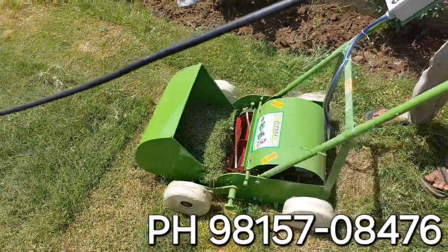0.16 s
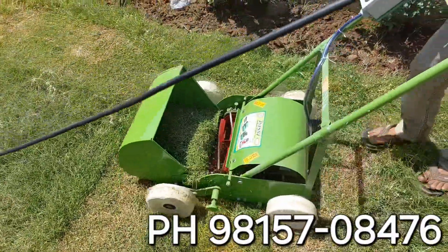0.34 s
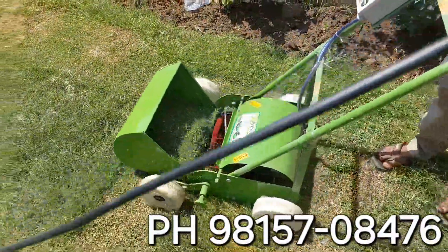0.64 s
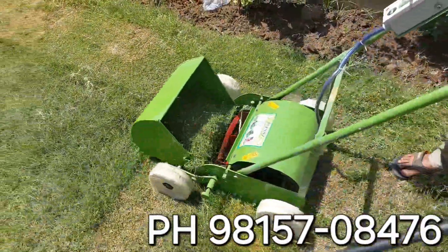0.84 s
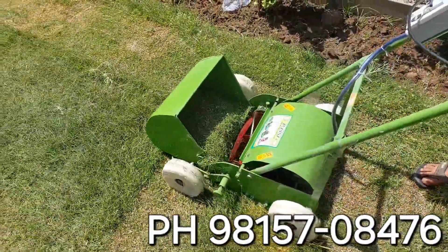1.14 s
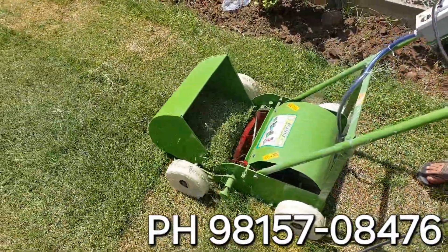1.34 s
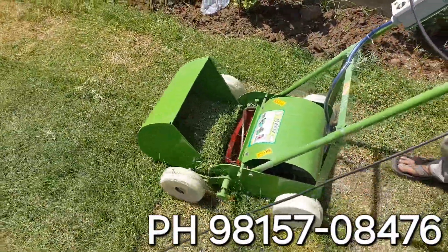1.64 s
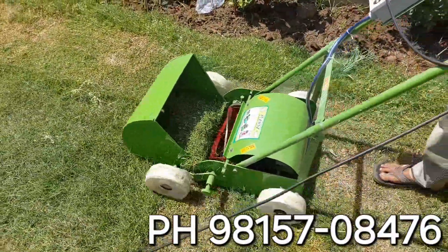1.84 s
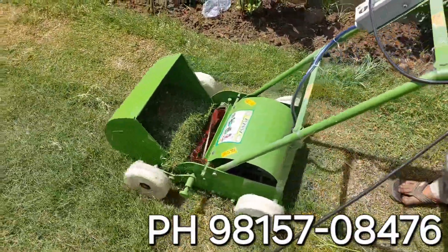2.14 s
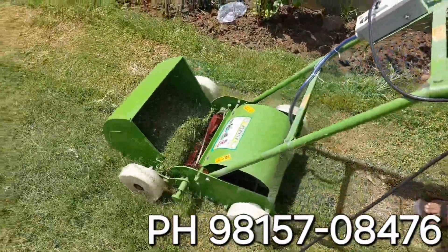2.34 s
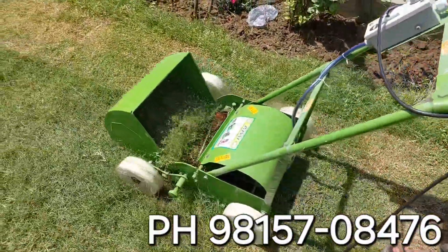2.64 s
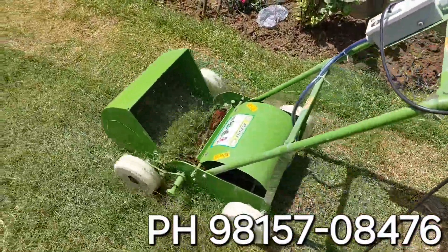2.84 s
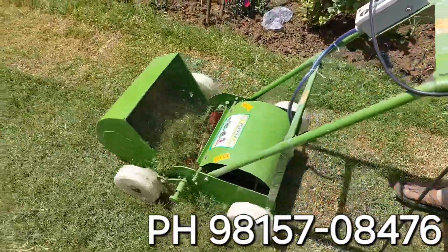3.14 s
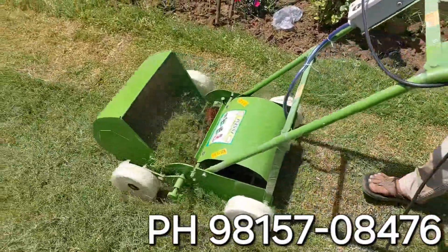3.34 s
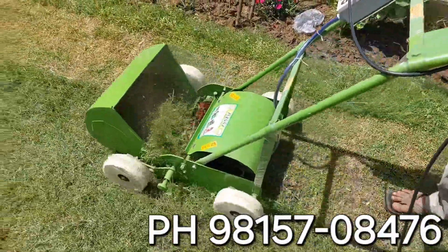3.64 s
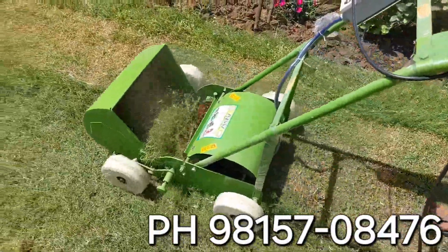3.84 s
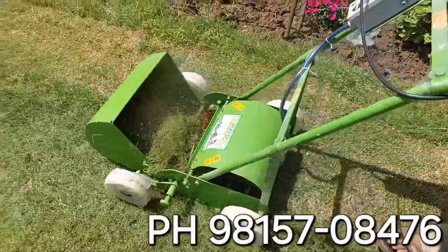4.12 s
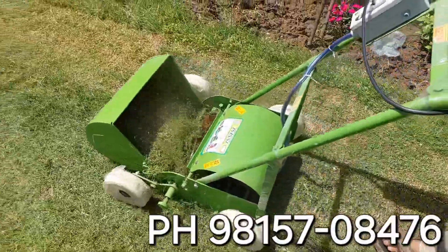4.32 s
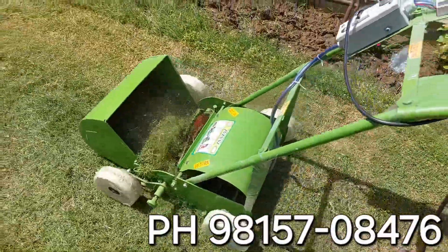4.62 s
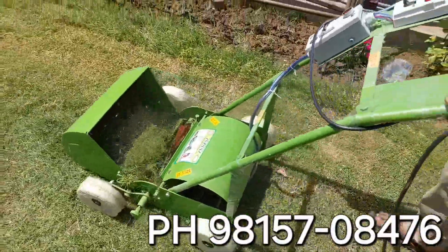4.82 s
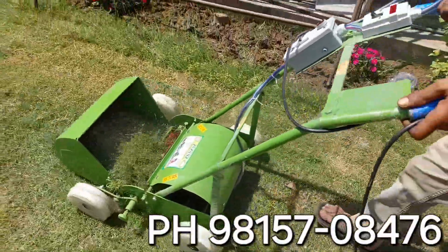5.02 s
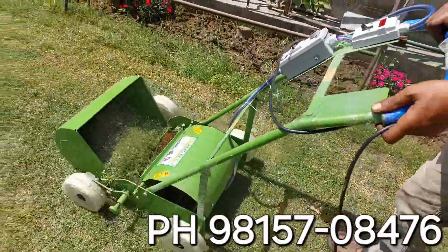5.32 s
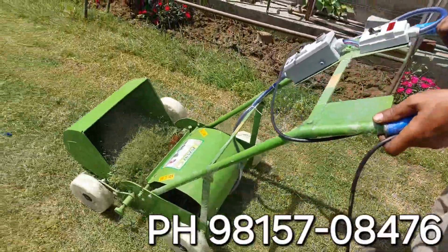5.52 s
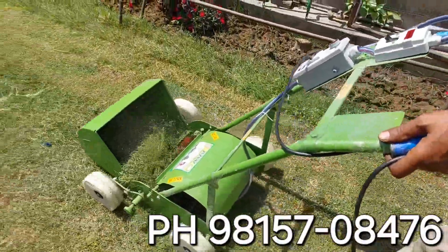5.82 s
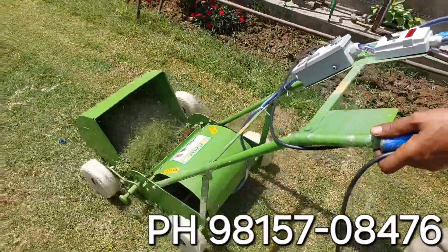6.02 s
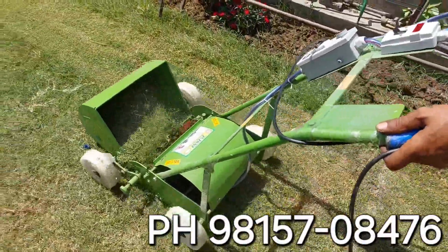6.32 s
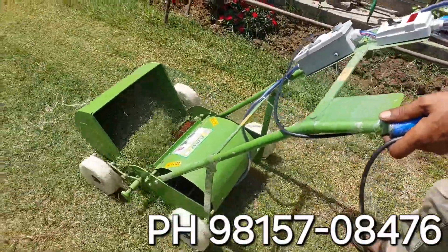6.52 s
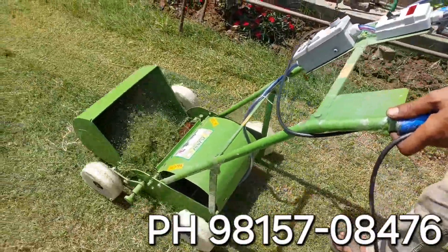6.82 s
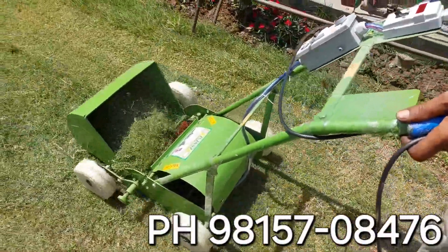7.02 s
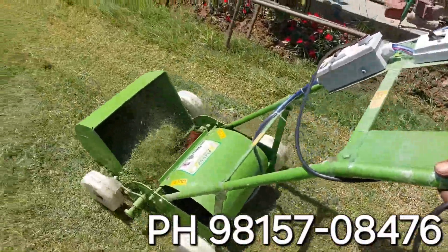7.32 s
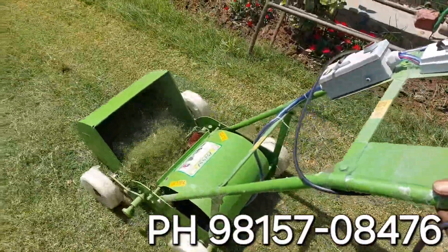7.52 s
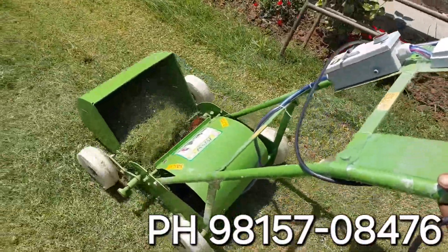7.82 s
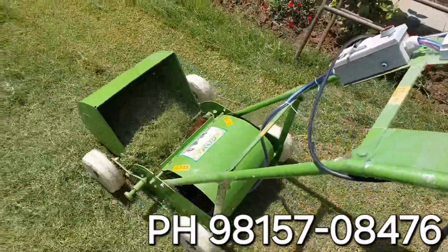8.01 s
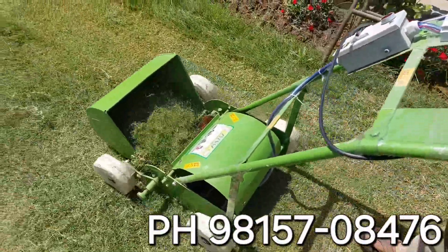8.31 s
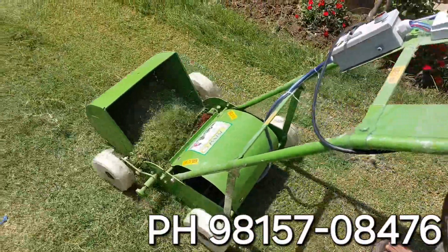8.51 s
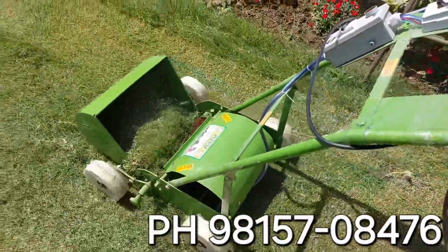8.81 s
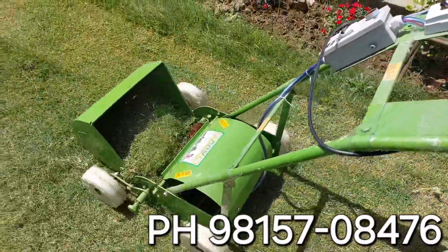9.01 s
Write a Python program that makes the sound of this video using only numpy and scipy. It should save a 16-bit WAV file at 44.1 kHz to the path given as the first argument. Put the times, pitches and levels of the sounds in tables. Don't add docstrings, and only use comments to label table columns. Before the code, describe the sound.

An electric cylinder mower whirrs steadily on a lawn, its metallic blade reel rattling and scraping over a low drumming hum.

```python
import sys
import numpy as np
from scipy import signal
from scipy.fft import rfft, irfft, next_fast_len
from scipy.io import wavfile
from scipy.ndimage import uniform_filter1d, map_coordinates

SR = 44100
rng = np.random.default_rng(int(sys.argv[2]) if len(sys.argv) > 2 else 0)


def store_wav(level_fs):
    pcm = np.round(np.clip(np.atleast_2d(level_fs), -1, 1) * 32767)
    wavfile.write(sys.argv[1], SR, pcm.T.astype(np.int16))


def decibels_to_gain(level_db):
    exponent = np.asarray(level_db, float) / 20
    return 10 ** exponent


N = 403956


def unit(x):
    return x / np.sqrt(np.mean(x ** 2, axis=-1, keepdims=True) + 1e-20)


def along(points, hz):
    f, v = np.transpose(points)
    return np.interp(np.log(hz + 1), np.log(f + 1), v)


def curves(rows):
    s, *cols = np.transpose(rows)
    return [np.interp(np.arange(N) / SR, s, c) for c in cols]


def spells(rows):
    t = np.arange(0, N + SR, 128) / SR
    swell = sum(db * np.exp(-((t - s) / half) ** 4) for s, half, db in rows)
    return np.interp(np.arange(N) / SR, t, swell)


def wobble(rate):
    step = 16
    knots = rng.standard_normal(int(N * rate / SR) + 4)
    curve = map_coordinates(knots, [np.arange(0, N, step) * rate / SR])
    return np.repeat(curve, step)[:N]


def filtered(x, response):
    m = next_fast_len(N + SR // 2)
    return irfft(rfft(x, m) * response(np.fft.rfftfreq(m, 1 / SR)), m)[..., :N]


# (frequency [Hz], shared power [0-1])
LIKENESS = [(40, 0.77), (120, 0.98), (300, 0.93), (640, 0.68), (900, 0.97), (1400, 0.36), (2500, 0.62),
            (5000, 0.42), (8000, 0.51), (15000, 0.27)]
# (frequency [Hz], lead [rad])
LEFT_LEAD = [(0, 0), (780, 1), (1210, 0.8), (2070, 0.42), (2840, 2.5), (4650, 4.5), (6200, 9), (8700, 13.5),
             (9650, 18), (11600, 17.5), (12500, 20.5), (13400, 23), (14600, 17), (15300, 28)]


def ports(x):
    def likeness(hz):
        return np.clip(along(LIKENESS, hz), 0, 1)

    def mix(row, sign):
        def shared(hz):
            lead = np.interp(hz, *np.transpose(LEFT_LEAD))
            return np.sqrt(likeness(hz)) * np.exp(.5j * sign * lead)
        return filtered(x[0], shared) + filtered(x[row], lambda hz: np.sqrt(1 - likeness(hz)))
    return np.array([mix(row=1, sign=0.98), mix(row=2, sign=-0.9)])


# (time [s], angle [turns])
REEL_AHEAD = [(0, .012), (.4, .028), (2.4, .152), (3.3, .136), (4.2, .135), (4.8, .146), (5.5, .129),
              (6, .126), (7.15, .124), (7.6, .111), (8, .116), (8.4, .112), (9.16, .111)]


def angle():
    return 10 * np.arange(N) / SR + curves(REEL_AHEAD)[0]


# (time [s], scrape as heard [dB], grass load [dB])
PUSH_EFFORT = [(0, -20, 0.5), (.4, -20.5, 0), (1, -21.5, 1), (1.75, -20.5, -3), (2.6, -21, 0),
               (3.7, -21.5, -0.5), (4.4, -22, 0.5), (4.9, -23, 2), (5.7, -22.5, 1), (6.1, -22, 2),
               (7.3, -22, 2.5), (8, -21.6, 1), (8.8, -22, -.5), (9.16, -21, 1)]


def push():
    return curves(PUSH_EFFORT)


def motor():
    hum = np.sin(2 * np.pi * 100.0 * np.arange(N) / SR)
    return decibels_to_gain(-43.5 + 0.28 * wobble(2.4)) * hum


# (time [s], level [dB])
WHEEL_BUMPS = [(.43, 7), (.86, 2), (1.36, 10), (1.94, 7), (2.28, 7), (2.75, 4), (2.97, 10), (3.33, 14),
               (3.6, 8), (3.9, 7), (4.27, 4), (5, 2), (5.6, 3), (5.96, 9), (6.45, 7), (6.7, 9), (6.92, 8),
               (7.35, 7), (7.53, 3.5), (7.95, 7), (8.15, 2), (8.38, 9.5), (8.8, 4)]


def box():
    turn = 2 * np.pi * (angle() - .52)
    air = signal.lfilter(*signal.iirpeak(140, 6, SR), rng.standard_normal(N))
    air = unit(signal.lfilter(*signal.iirpeak(140, 9, SR), air))
    boom = 0.34 * np.cos(13 * turn) + 0.49 * np.cos(14 * turn) + .5 * air
    bumps_db = spells([(s, 0.12, db) for s, db in WHEEL_BUMPS])
    return decibels_to_gain(-47 + bumps_db) * unit(boom)


# (frequency [Hz], density [dB per Hz])
CASING_RUMBLE = [(20, -41), (60, -20.5), (85, -26.5), (140, -17.5), (185, -18.5), (250, -6.5), (320, -7.5),
                 (440, -22), (500, -20.5), (600, -34), (900, -55)]


def rumble():
    noise = rng.standard_normal((3, N))
    return unit(ports(filtered(noise, lambda hz: decibels_to_gain(along(CASING_RUMBLE, hz)))))


# (angle [turns], [(multiple of the turn, level [dB])])
REEL_ORDERS = [
    (.52, [(5, -35), (7, -24), (19, -22)]),
    (.1, [(22, -13), (23, -7.5), (25, -2), (26, -26)]),
    (.53, [(28, 0.5), (30, 2.5)]),
    (.545, [(27, -19), (29, -0.5)]),
    (.28, [(34, -0.5), (36, -5.5), (40, -11), (42, -3.5)]),
    (.58, [(33, -12), (37, -6), (38, -5.5), (43, -14.5)]),
    (.87, [(48, -7.5), (49, -9), (50, -22), (56, -18.5)]),
    (.53, [(66, -26), (84, -5.5), (89, -12.5), (90, -9.5), (91, -7.5), (92, -6.5)]),
]
# (middle [s], half length [s], level [dB])
WHINE_SPELLS = [
    (.3, .5, 5),
    (3.1, .8, 9),
    (7.7, .4, 5),
]


def reel_orders(turn):
    whine_db = spells(WHINE_SPELLS) - 8
    total = 0
    for at, group in REEL_ORDERS:
        for k, db in group:
            order = round(k)
            level_db = db + 1.8 * wobble(2.45) + whine_db * (order == 84)
            total = total + decibels_to_gain(level_db) * np.cos(order * 2 * np.pi * (turn - at) + 0.6 * wobble(5))
    return unit(total)


# (time [s], level [dB])
TOOTH_MESH = [(0, -26), (.6, -24), (1, -23), (2, -23.2), (2.75, -25), (3, -29), (3.55, -29), (4, -26.5),
              (4.6, -25.2), (5.1, -27), (6.2, -23.5), (6.7, -25), (7.1, -23.5), (8.65, -22.5), (9.16, -24)]


def drive():
    turn = angle()
    tooth_db = curves(TOOTH_MESH)[0] + 1.37 * wobble(18)
    tooth = np.sqrt(2) * decibels_to_gain(tooth_db) * np.sin(24 * 2 * np.pi * turn + 0.2 * wobble(16))
    drum = decibels_to_gain(-0.5) * reel_orders(turn) * decibels_to_gain([[-.7], [.7]]) + decibels_to_gain(-4.5) * rumble()
    drum_db = -27.5 + push()[1]
    return tooth * decibels_to_gain([[-.2], [.2]]) + decibels_to_gain(drum_db) * drum


# (time [s], level over the scrape [dB], length [s])
CAUGHT_GRIT = [
    (6.015, 5.5, .028),
]


def friction(turn):
    t = np.arange(N) / SR
    press = .5 * np.cos(2 * np.pi * (turn - .9))
    press = press + 0.091 * np.cos(6 * 2 * np.pi * (turn - .1))
    press = press + .5 * np.cos(24 * 2 * np.pi * turn)
    press = press + 0.077 * wobble(14) + 0.33 * wobble(60)
    for s, db, length in CAUGHT_GRIT:
        press = press + db * (t > s) * np.exp(-np.abs((t - s) / length) ** 2)
    return rng.standard_normal((3, N)) * decibels_to_gain(press)


# (middle [s], half length [s], level [dB])
CLICK_SPELLS = [
    (6.3, .4, .5),
    (8.5, .75, 3.5),
]


def tick(turned):
    passes = np.diff(np.floor(angle() - .11), prepend=0) > 0
    blows = passes * decibels_to_gain(28 + 3 * turned + spells(CLICK_SPELLS) + 1.5 * wobble(9))
    return signal.lfilter(*signal.iirpeak(4350, 8, SR), blows)


# (frequency [Hz], width [Hz], angle of hardest bearing [turns], arc [turns])
STEEL_MODES = [(1030, 50, .2, .05), (1110, 60, .38, .05), (1640, 50, .64, .06), (2035, 55, .3, .45),
               (2240, 45, .25, .3), (2345, 50, .23, .03), (2420, 70, .92, .1), (2545, 55, .55, .2),
               (2840, 45, .55, .2), (3370, 70, .4, .05), (3990, 120, .1, .03), (4230, 100, .09, .04),
               (4380, 90, .76, .03), (4680, 90, .8, .07), (4800, 90, .86, .05), (4995, 50, .88, .16),
               (5493, 30, .68, .18), (5260, 300, .6, .15), (5800, 90, .66, .04), (6520, 50, .92, .08),
               (6690, 110, .66, .05), (4700, 700, .12, .015), (9000, 7000, .11, .02), (8000, 5000, .3, .03),
               (7000, 4000, .48, .015)]
# (level at first [dB], level when the microphone is turned [dB])
MODE_LEVELS = [(-7, 8.5), (-6, 12), (12, 3), (-4.5, 10.5), (-19, 11), (6, -1), (-11, 8.5), (-4, -5),
               (-11, 2.5), (9, -14), (-14, 2), (4, 5), (7, 7), (14.5, 0), (7, -1), (12, 6.5), (7, 3.5),
               (-12, -8), (7, 2), (-1, -3), (-3, 2), (-4, 2), (-14, -14), (-5, -4), (-1.5, -8)]
# (middle [s], half length [s], level [dB])
LOWER_TWISTS = [
    (1.05, .5, 18),
    (2, 0.27, 9),
    (3.35, 0.32, 18.5),
    (3.918, 0.24, 17.5),
    (5.3, 0.37, 10),
    (8.75, .3, 14),
]
UPPER_TWISTS = [
    (.45, .2, 2),
    (1.75, .25, 4),
    (2.6, .45, 10.4),
    (3.8, 0.92, 6),
    (4.9, 0.27, 2),
    (7.25, .25, 4),
]
TOP_TWISTS = [
    (.3, .3, 3),
    (4.05, .35, 6),
    (5.1, 0.7, 9.3),
    (6.8, .35, 6),
]
RESTING_LEVELS = -17.5, -6, -3


def ringing(scrape, turn, turned):
    twists = (LOWER_TWISTS, UPPER_TWISTS, TOP_TWISTS)
    lower_db, upper_db, top_db = [rest + spells(rows) for rest, rows in zip(RESTING_LEVELS, twists)]
    rings = 0
    for (hz, width, at, arc), (first_db, last_db) in zip(STEEL_MODES, MODE_LEVELS):
        off = (turn - at + .5) % 1 - .5
        bearing = .09 + np.exp(-(off / arc) ** 2)
        twist_db = lower_db * (4500 < hz < 4900) + upper_db * (4900 < hz < 5100) + top_db * (5400 < hz < 5600)
        db = first_db + (last_db - first_db) * turned + twist_db + 0.87 * wobble(7.4) + 0.83 * wobble(0.71)
        rings = rings + signal.lfilter(*signal.iirpeak(hz, hz / width, SR), scrape * bearing * decibels_to_gain(db))
    return rings


def paths(left, right, ripple_db, ripple_hz):
    knots = rng.standard_normal((2, SR // 40))

    def response(hz):
        ripple = np.array([map_coordinates(row, [hz / ripple_hz]) for row in knots])
        colour = np.array([along(left, hz), along(right, hz)])
        return decibels_to_gain(colour + ripple_db * ripple) * (hz > 380)
    return response


# (frequency [Hz], density [dB per Hz])
LEFT_AT_START = [(500, -11.5), (800, -12), (1400, -14.5), (2000, -12.5), (2600, -8.5), (3500, -8.5),
                 (5000, -10.5), (6000, -8.5), (6800, -6), (7400, -15), (8400, -21.5), (11800, -16.5),
                 (13500, -23.5), (15200, -22)]
RIGHT_AT_START = [(500, -14), (900, -9.5), (1350, -16), (2000, -15), (2600, -5), (3400, -6.5), (4600, -1.5),
                  (5500, -6.5), (6750, -29), (7100, -44), (8300, -35), (11500, -25.5), (14300, -24.5),
                  (15200, -36)]
# (frequency [Hz], density [dB per Hz])
LEFT_TURNED = [(500, -9.5), (800, -9), (1400, -10.5), (2000, -14), (2600, -11.5), (3500, -6), (5000, -6),
               (6000, -5.5), (6800, -9.5), (7400, -16), (8400, -20), (11800, -16), (13500, -24),
               (15200, -22)]
RIGHT_TURNED = [(500, -8), (800, -12), (1350, -13.5), (2000, -11.5), (2600, -7.5), (3400, -6.5),
                (4600, -9.5), (5500, -7), (6300, -14), (7300, -15), (9500, -24.5), (11500, -13.5),
                (14300, -14.5), (15200, -19)]


def microphone(pair, turned):
    first = filtered(pair, paths(LEFT_AT_START, RIGHT_AT_START, ripple_db=3.0, ripple_hz=44.63))
    last = filtered(pair, paths(LEFT_TURNED, RIGHT_TURNED, ripple_db=1.97, ripple_hz=45.25))
    return np.sqrt(1 - turned) * first * (1 - 0.33 * turned) + turned * last


# (time [s], share turned [0-1])
MICROPHONE_TURN = [(0, 0), (1.2, 0.1), (2.5, 0.24), (3.8, 0.36), (4.3, 0.51), (4.8, 0.68), (6, 0.71),
                   (7.5, 0.91), (9.16, 0.81)]


def blades():
    scrape_db, load_db = push()
    turned = np.clip(curves(MICROPHONE_TURN)[0], 0, 1)
    turn = angle()
    scrape = friction(turn)
    steel = scrape + tick(turned) + ringing(scrape, turn, turned)
    heard = microphone(ports(steel), turned)
    fizz = filtered(heard, lambda hz: 1 / (1 + (7500 / (hz + 1)) ** 8))
    fizz_db = -1.56 + 0.86 * turned + .12 * load_db + .5 * (scrape_db.mean() - scrape_db)
    fizz_gain = decibels_to_gain(fizz_db + 0.31 * wobble(8)) - 1
    return decibels_to_gain(scrape_db + 14) * (heard + fizz * fizz_gain)


def scene():
    return motor() + box() + drive() + blades()


def top_cut(x):
    return signal.sosfilt(signal.butter(12, 15660, fs=SR, output="sos"), x)


def record(dry):
    dry = filtered(dry, lambda hz: 1 / np.sqrt(1 + (hz / 15250) ** 60))
    dry = dry / (1 + np.abs(dry / .85) ** 10) ** .1
    hz, _, z = signal.stft(dry, SR, nperseg=2048)
    band = uniform_filter1d(np.abs(z) ** 2, size=11, axis=1)
    heard = (band > decibels_to_gain(-63.6) ** 2) | (hz[:, None] < 6500)
    top = hz > 15180
    top_power = (np.abs(z[:, top]) ** 2).sum(axis=(0, 1))
    chance = decibels_to_gain(4 * rng.standard_normal(len(top_power)))
    heard[:, top] = top_power * chance > np.quantile(top_power, .7)
    heard[:, hz > 15620] = False
    mix = signal.istft(z * heard, SR, nperseg=2048)[1][:, :N]
    return top_cut(mix)


dry = scene()
out = record(dry)
store_wav(out)
```